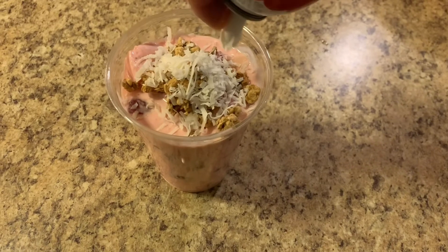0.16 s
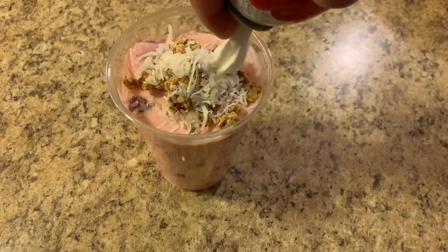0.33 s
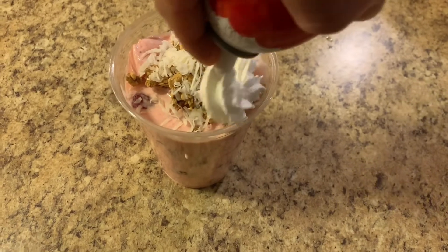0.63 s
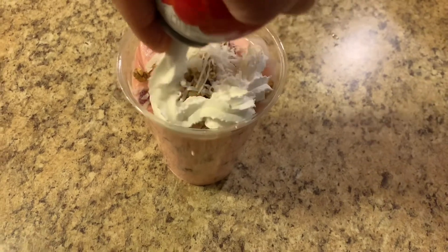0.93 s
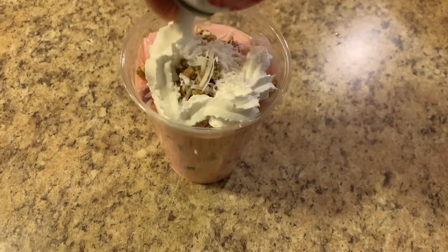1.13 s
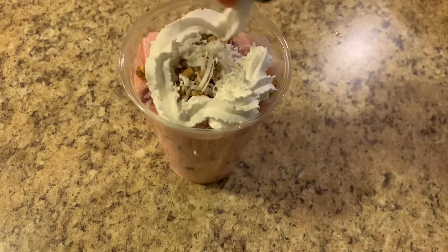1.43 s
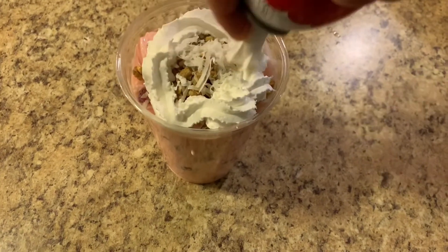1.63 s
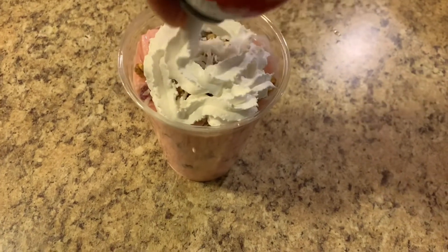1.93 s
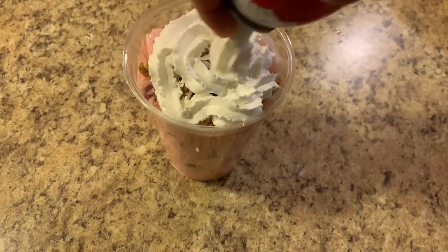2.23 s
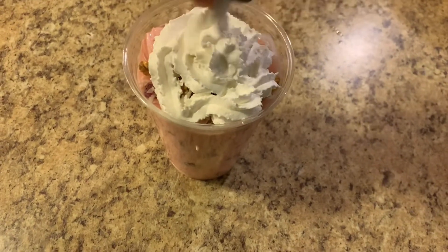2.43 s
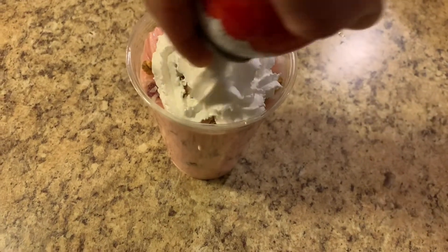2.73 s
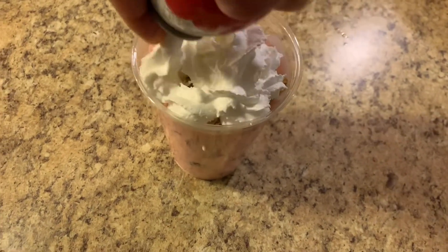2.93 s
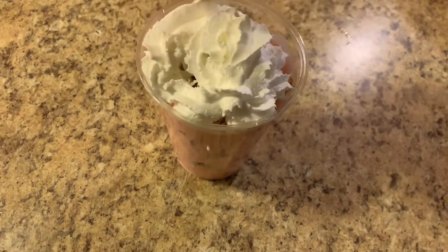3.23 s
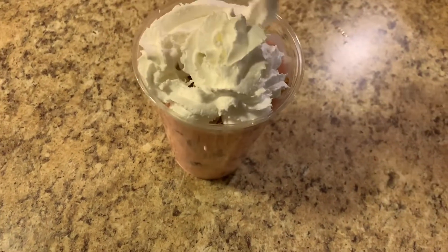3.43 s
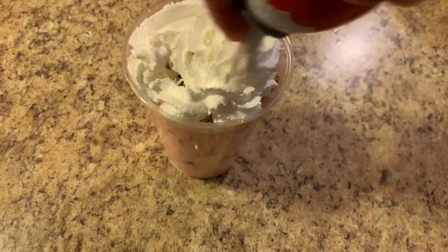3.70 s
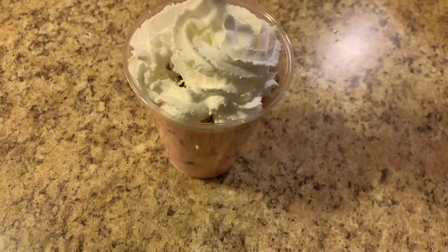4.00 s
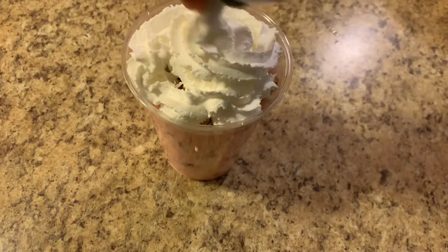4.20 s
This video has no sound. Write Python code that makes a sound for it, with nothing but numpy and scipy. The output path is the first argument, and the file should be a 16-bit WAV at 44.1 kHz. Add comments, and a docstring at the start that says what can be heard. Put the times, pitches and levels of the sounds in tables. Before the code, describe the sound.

A whipped cream can sprays in one long burst close by: bright whistling hiss with a dense, wet, crackling sputter and cup rumble.

```python
"""Whipped cream is piped from an aerosol can onto a cup on a stone counter, close to two microphone ports.
Over a low kitchen murmur the valve opens in small jerks: gas hisses as turbulence and whistles in the nozzle,
and a finger's press gives a soft thump. Gas pockets then burst in the cream as a dense sputter that rings
in the nozzle tube, with dry ticks in the open air; the stream rumbles in the cup, and large pockets pop.
Late on, the tip dips into the heap: the ticks grow quieter and the upper tube ring dies."""
import sys
import numpy as np
from scipy import signal
from scipy.fft import rfft, irfft, next_fast_len
from scipy.io import wavfile

SR = 44100
rng = np.random.default_rng(int(sys.argv[2]) if len(sys.argv) > 2 else 0)


def wav_out(sig):
    """Save sig, one row per channel (or a flat mono array), as 16-bit PCM at SR to the path in sys.argv[1]."""
    wavfile.write(sys.argv[1], SR, np.round(np.clip(np.atleast_2d(sig).T, -1, 1) * 32767).astype(np.int16))


N = 191950


def amp(db):
    """Logarithmic level: decibels to amplitude gain."""
    return 10 ** (np.asarray(db) / 20)


def rms_one(x):
    """Normalisation of mean power: scale to rms 1."""
    return x / np.sqrt(np.mean(x ** 2) + 1e-20)


def in_time(rows):
    """Linear interpolation: each column after the times becomes a curve of one value a sample."""
    s, *columns = np.transpose(rows)
    return [np.interp(np.arange(N) / SR, s, c) for c in columns]


def drift(rate_hz):
    """Low-passed random fluctuation of rms 1: coarse noise twice through a one-pole filter."""
    step, settling = 20, 4000  # samples a coarse step; coarse steps dropped
    r = np.exp(-2 * np.pi * rate_hz * step / SR)
    noise = rng.standard_normal(N // step + settling + 2)
    slow = signal.lfilter([1], [1, -2 * r, r * r], noise)[settling:]
    return np.interp(np.arange(N) / step, np.arange(len(slow)), rms_one(slow))


def resonate(x, modes):
    """Modal resonance: parallel two-pole filters (pitch_hz, width_hz, level_db) with alternating signs."""
    out = 0
    for k, (hz, width_hz, level_db) in enumerate(modes):
        r = np.exp(-np.pi * width_hz / SR)
        b = (1 - r * r) / 2 * np.array([1, 0, -1])
        a = [1, -2 * r * np.cos(2 * np.pi * hz / SR), r * r]
        out = out + (-1) ** k * amp(level_db) * signal.lfilter(b, a, x)
    return out


def twice(x, modes):
    """Cascaded resonance: the filters applied twice, for steep skirts; rms 1."""
    return rms_one(resonate(resonate(x, modes), modes))


def coloured(spectrum, patchy_db, rate_hz, count):
    """Filtered noise: two unrelated noises of one colour, in overlapping bands that flicker separately."""
    hz = np.maximum(np.arange(N // 2 + 1) * SR / N, 1)
    where, level_db = np.transpose(spectrum)
    colour_db = np.interp(np.log(hz), np.log(where), level_db, -60, -60)
    shaped = rfft(rng.standard_normal((2, N))) * amp(colour_db)
    # band number of each frequency, on a logarithmic scale
    place = np.interp(np.log(hz), np.log(where[[0, -1]]), [0, count - 1])
    bands = [irfft(shaped * np.clip(1 - abs(place - k), 0, 1), N) for k in range(count)]
    return rms_one(sum(amp(patchy_db * drift(rate_hz)) * band for band in bands))


def rise(before_db, start_s, length_s, power):
    """Onset envelope: a gain that grows from a low level to 1 as a power of time."""
    progress = np.clip((np.arange(N) / SR - start_s) / length_s, 0, 1)
    return np.clip(amp(before_db) + progress ** power, 0, 1)


def swell(t, peak_s):
    """Transient envelope: up to 1 at the peak time, then away."""
    grown = np.clip(t / peak_s, 0, None)
    return (grown * np.exp(1 - grown)) ** 2


def kitchen():
    """Broadband background: low filtered noise whose bands waver slowly."""
    # the kitchen's low murmur of air and appliances: pitch_hz [Hz], relative level_db [dB per Hz]
    murmur_colour = [(28, -44), (42, -20), (60, 7), (90, -3.5), (140, 5), (190, 0), (260, -20)]
    return amp(-64) * coloured(murmur_colour, patchy_db=-2.5, rate_hz=1.8, count=4)


def jet(jet_db, whistle_db, treble_db):
    """Jet turbulence: smooth bright noise at the valve, with a broad nozzle whistle that comes and goes."""
    # colour of the turbulent jet: pitch_hz [Hz], relative level_db [dB per Hz]
    jet_colour = [(1200, -30), (2700, -19), (4400, -13.5), (5100, -10.5), (5800, -6), (6800, -1),
                  (7700, -6), (8600, -6), (9900, -6), (11500, -10), (13000, -11), (14200, -17),
                  (16300, -20)]
    # resonances of the whistle: pitch_hz [Hz], width_hz [Hz], relative level_db [dB]
    whistle_modes = [(8600, 800, 0), (9350, 1100, -4)]
    whistle = resonate(resonate(rng.standard_normal((2, N)), whistle_modes), [(8800, 1800, 0)])
    hiss = coloured(jet_colour, patchy_db=1.27, rate_hz=7.8, count=14)
    high_pass = signal.butter(2, 8000, "high", fs=SR, output="sos")
    treble = signal.sosfiltfilt(high_pass, hiss)
    hiss = hiss + (amp(treble_db) - 1) * treble
    singing = amp(whistle_db + drift(9)) * rms_one(whistle)
    return amp(jet_db) * (amp(-1.5) * hiss + singing)


def thump():
    """Impulsive excitation: a finger presses the nozzle, one soft, low, decaying oscillation."""
    start_s, pitch_hz, swell_s = 0.012, 85, 0.012
    t = np.clip(np.arange(N) / SR - start_s, 0, 1)
    envelope = t / swell_s * np.exp(1 - t / swell_s)
    return amp(-70) * envelope * np.sin(2 * np.pi * pitch_hz * t) * [[1], [0]]


def clicks(per_s, spread_db):
    """Random point process: gas pockets burst at random, in clumps, with very uneven sizes."""
    sizes = amp(spread_db * np.minimum(rng.exponential(1, N), 4)) * rng.choice([-1, 1], N)
    chance = per_s * amp(1.2 * drift(60)) / SR
    return rms_one(sizes * (rng.random(N) < chance))


def bursts(per_s, spread_db, noise_db):
    """Impulsive and diffuse excitation: fine bursts over the stream's rush; row two is an unrelated rush."""
    rush = rng.standard_normal((2, N))
    fine = clicks(per_s, spread_db) + amp(noise_db) * rush[0]
    return rms_one(np.array([fine, np.sqrt(1 + amp(noise_db) ** 2) * rush[1]]))


def sputter(sputter_db, upper_db, low_db, high_db, hollow_db):
    """Source and resonator: one burst train rings the nozzle tube, the spit at its tip and the hollow."""
    # resonances of the nozzle tube, its upper range, the spit's two ranges, and the hollow
    # between cup and tube: pitch_hz [Hz], width_hz [Hz], relative level_db [dB]
    tube_modes = [(819.6, 52, 2.5), (967, 98, -3.5), (1102, 94, -4), (1221, 32, 3), (1357, 83, -2.5)]
    upper_modes = [(1467, 263, 1), (1648, 14, -2.2)]
    low_spit_modes = [(1922, 610, 0.25), (2670, 820, 1)]
    high_spit_modes = [(2960, 1000, -1), (3930, 1200, 1)]
    hollow_modes = [(705, 127, 0)]
    train = bursts(per_s=600.0, spread_db=2.5, noise_db=-4.5)
    tube = rms_one(resonate(resonate(train, tube_modes), [(1009, 310, 0)]))
    upper = rms_one(resonate(resonate(train, upper_modes), [(1473, 530, 0)]))
    spit = amp(low_db) * twice(train, low_spit_modes) + amp(high_db) * twice(train, high_spit_modes)
    hollow = amp(hollow_db) * twice(train, hollow_modes)
    return amp(sputter_db) * tube + amp(upper_db) * upper + spit + hollow


def crackle(crackle_db):
    """Heavily damped resonance: pockets bursting in the open air are short dry ticks."""
    # resonances of the ticks: pitch_hz [Hz], width_hz [Hz], relative level_db [dB]
    tick_modes = [(1284, 860, 5), (4200, 1000, -24)]
    ticks = twice(clicks(per_s=220.0, spread_db=2.5) + 1e-18, tick_modes)
    return amp(crackle_db) * ticks * [[1], [0]]


def rumble(rumble_db):
    """Cavity resonance: the stream drums low in the cup, whose air rings at two pitches."""
    # colour of the drumming stream: pitch_hz [Hz], relative level_db [dB per Hz]
    rumble_colour = [(60, -31), (140, -11.5), (200, -6), (290, -2), (420, 1), (520, -4.5), (650, -15.5),
                     (800, -10)]
    # resonances of the air in the cup: pitch_hz [Hz], width_hz [Hz], relative level_db [dB]
    cup_modes = [(285, 41, 0.46), (415, 14, 1.8)]
    broad = coloured(rumble_colour, patchy_db=0.2, rate_hz=11.3, count=8)
    return amp(rumble_db) * rms_one(broad + amp(-6.0) * resonate(broad, cup_modes))


def pops():
    """Damped oscillation: a large pocket swells and rings two or three cycles, then cracks as it bursts."""
    # the loudest bursts: peak_s [s], ring peak_db [dB], pitch_hz at the peak [Hz], crack_db over the ring [dB]
    loud_bursts = [(0.05, -50, 1160, 2), (0.074, -46, 1320, -10), (0.084, -43, 1200, -10),
                   (0.103, -36, 1290, -11), (0.125, -46, 1400, -6), (0.148, -34, 1210, -2),
                   (0.173, -35, 1280, -12), (0.189, -35, 1280, -14), (0.211, -38, 1260, -13),
                   (0.252, -31, 1210, -17), (0.267, -33, 1220, -16), (0.303, -33, 1120, -10),
                   (0.319, -30, 1150, -9), (0.387, -32, 1500, -8), (0.417, -29, 1260, -10),
                   (0.445, -29, 1000, -8), (0.538, -27, 1290, -14), (0.567, -30, 1250, -4),
                   (0.613, -30, 1160, -18), (0.641, -29, 1200, -7), (0.661, -29, 1220, -12),
                   (0.698, -29, 1000, 0), (0.736, -32, 1120, -11), (0.747, -32, 1350, -11),
                   (0.762, -31, 1060, -8), (0.8, -33, 1160, -6), (0.861, -33, 1340, -9),
                   (0.883, -34, 1320, -9), (0.893, -27, 1300, -11), (0.919, -30, 1350, -9),
                   (0.936, -31, 1310, -17), (0.961, -32, 1220, -14), (0.975, -30, 1290, -8),
                   (1.021, -35, 1260, -6), (1.035, -30, 1350, -11), (1.054, -30, 1260, -9),
                   (1.08, -35, 1170, -1), (1.095, -25, 1400, -6), (1.103, -35, 1240, -8),
                   (1.129, -32, 1340, -14), (1.137, -32, 1280, -8), (1.156, -33, 1260, 5),
                   (1.165, -31, 1470, -7), (1.176, -31, 1360, -5), (1.183, -28, 1300, -11),
                   (1.195, -33, 1210, -12), (1.204, -35, 1500, -9), (1.217, -33, 1260, -6),
                   (1.229, -34, 1330, -2), (1.237, -31, 1430, -17), (1.251, -29, 1350, -12),
                   (1.266, -34, 1250, -6), (1.303, -33, 1360, -12), (1.323, -26.5, 1390, -15),
                   (1.332, -35, 1340, -15), (1.37, -35, 1280, -13), (1.389, -35, 1570, -12),
                   (1.398, -37, 1290, -5), (1.408, -31, 1310, -18), (1.439, -35, 1310, -8),
                   (1.455, -37, 1270, -8), (1.476, -29.5, 1350, -13), (1.487, -33, 1210, -15),
                   (1.504, -32, 1240, -11), (1.529, -28, 1350, -15), (1.537, -32, 1300, -14),
                   (1.544, -32, 1170, -19), (1.556, -28, 1140, -14), (1.585, -31, 1340, -9),
                   (1.624, -30, 1300, -4), (1.66, -34, 1180, -7), (1.679, -29, 1270, -10),
                   (1.703, -28, 1230, 0), (1.73, -33, 1280, -6), (1.76, -32, 1210, -11),
                   (1.794, -35, 1130, -12), (1.81, -32, 1160, -13), (1.828, -31, 1260, -13),
                   (1.867, -35, 1260, -10), (1.899, -29, 1210, -8), (1.933, -29, 1220, -15),
                   (1.961, -28, 1310, -11), (1.985, -31, 1430, -10), (1.994, -31, 1340, -9),
                   (2.01, -29, 1220, -10), (2.045, -31, 1220, -10), (2.064, -33, 1260, -8),
                   (2.098, -31, 1170, -3), (2.11, -31, 1280, -2), (2.15, -30, 1240, -3),
                   (2.17, -30, 1150, -3), (2.203, -28, 1250, -7), (2.214, -25, 1050, -6),
                   (2.263, -24, 980, -8), (2.362, -28, 1210, -1), (2.381, -27, 1190, -10),
                   (2.389, -27, 1050, -14), (2.421, -28, 1350, -3), (2.445, -29, 1400, -2),
                   (2.457, -26, 1210, -11), (2.492, -27, 1140, -7), (2.545, -29, 1250, -4),
                   (2.571, -27, 1200, -8), (2.582, -28, 1150, -5), (2.618, -29, 1100, -8),
                   (2.634, -26, 950, -8), (2.643, -27, 1020, -9), (2.66, -31, 1150, -8),
                   (2.686, -30, 1030, -12), (2.704, -27, 980, -7), (2.726, -28, 1150, -8),
                   (2.768, -25, 1040, -8), (2.779, -24, 1000, -4), (2.917, -24, 1180, -10),
                   (3.018, -27, 1110, -11), (3.04, -28, 1310, -7), (3.048, -31, 1220, -5),
                   (3.069, -32, 1210, -8), (3.089, -34, 1230, -6), (3.101, -31, 1220, -5),
                   (3.111, -32, 1260, -7), (3.167, -28, 1340, -15), (3.219, -28, 1410, -13),
                   (3.247, -25, 1260, 1), (3.269, -27, 1270, -16), (3.303, -31, 1340, -5),
                   (3.323, -30, 1380, -12), (3.353, -32, 1170, -10), (3.399, -30, 1200, -11),
                   (3.469, -27, 1110, -9), (3.492, -26, 1210, -6), (3.633, -32, 990, -13),
                   (3.645, -30, 1020, -10), (3.675, -31, 980, -5), (3.79, -31, 1050, -11),
                   (3.818, -31, 1030, -11), (3.849, -32, 1070, -10), (3.872, -32, 1160, -12),
                   (3.881, -31, 1100, -10), (3.904, -30, 1110, -13), (3.915, -31, 1030, -10),
                   (3.95, -33, 1040, -16), (3.977, -32, 1080, -11), (4.135, -28, 1040, -14),
                   (4.221, -30, 990, -2), (4.24, -30, 1120, -11), (4.257, -33, 1070, -7),
                   (4.267, -32, 1010, -7), (4.328, -32, 1070, -6)]
    ring_s, crack_s, crack_lag_s = 0.000903, 0.00036, 0.0007  # swell times; the crack starts after the ring
    crack_hz, sag_hz_per_s = 4100, 48000  # the ring drops in pitch as the pocket opens
    out = np.zeros((2, N + SR))
    t = np.arange(round(.012 * SR)) / SR
    phases = rng.random((len(loud_bursts), 2))  # in turns
    for (s, peak_db, hz, crack_db), turn in zip(loud_bursts, phases):
        cycles = (hz - sag_hz_per_s * (t / 2 - ring_s)) * t
        ring = swell(t, ring_s) * np.sin(2 * np.pi * (cycles + turn[0]))
        crack = swell(t - crack_lag_s, crack_s) * np.sin(2 * np.pi * (crack_hz * t + turn[1]))
        at = round((s - ring_s) * SR)
        out[0, at:at + len(t)] += amp(peak_db) * (ring + amp(crack_db) * crack)
    return out[:, :N]


def dips(x):
    """Time-varying band filtering: two ranges are cut or slightly raised as the nozzle circles."""
    # gains of the two ranges: time_s [s], low_dip_db [dB], high_dip_db [dB]
    dip_curves = [(0.0, -3, -11), (0.3, -3, -7), (0.6, 2, 0.5), (0.85, 1, -3), (1.1, -7, -14),
                  (1.4, -11, -10), (1.6, -3, -4), (1.9, -4, 0.5), (2.2, -2.5, 1), (2.6, 0, 1), (3.0, -5, 2),
                  (3.2, -12, -4), (3.4, -10, -8), (3.6, 0, -1), (4.0, 0.5, -6), (4.35, 0, -4)]
    ranges_hz = (717, 120), (2900, 500)  # centre and width
    for (centre_hz, width_hz), gain_db in zip(ranges_hz, in_time(dip_curves)):
        x = x + (amp(gain_db) - 1) * resonate(x, [(centre_hz, width_hz, 0)])
    return x


def ports(near, other):
    """Interaural-style phase and coherence: the right port trails; a share scattered by the counter is its own."""
    # the two ports: pitch_hz [Hz], right_trails [radians], left_over_right_db [dB], likeness [0-1]
    port_rows = [(30, 0.8, -1.5, 0.96), (330, -0.93, -1.5, 1), (418, -0.74, -3.5, 0.96),
                 (525, 0.5, -0.5, 0.98), (683, 1.33, -3, 0.67), (746, 0.7, -1, 0.91), (1020, 0.6, 1, 0.88),
                 (1300, 0.26, -1, 0.76), (1720, 0.22, -0.5, 1), (2510, 1.8, 0, 0.57),
                 (2770, 2.5, -0.1, 0.68), (2870, 4.5, -1.5, 1), (3010, 3, -0.3, 1), (3170, 2.5, -0.5, 0.56),
                 (3940, 2, 0, 0.77), (4224.6, 3, 2.5, 0.77)]
    # treble ranges where the two channels are opposite or equal: from_hz [Hz], to_hz [Hz], phase of right #
    # against left [half turns]
    locked_ranges = [(4250, 5050, 1), (6350, 7550, 2), (8600, 9200, 3), (10500, 11700, 4),
                     (12850, 13800, 5), (14500, 16500, 6)]
    size = next_fast_len(N + SR // 4)
    hz = np.arange(size // 2 + 1) * SR / size
    locked = [(edge, np.pi * turns, 0, 1) for *edges, turns in locked_ranges for edge in edges]
    # between locked ranges the phase steps on and the likeness drops to 0.8
    gaps = [(a[1] + part * (b[0] - a[1]), np.pi * (a[2] + .12 + .7 * part), 0, .8)
            for a, b in zip(locked_ranges, locked_ranges[1:]) for part in (.1, .8)]
    where, trail, balance_db, alike = np.transpose(sorted(port_rows + locked + gaps))
    alike = np.clip(np.interp(hz, where, alike), 0, 1)
    tilt = amp(np.interp(hz, where, balance_db) / 2)
    near, other = rfft(near, size), rfft(other, size)
    mixed = alike * near + np.sqrt(1 - alike ** 2) * other
    right = mixed * np.exp(-1j * np.interp(hz, where, trail))
    return np.array([irfft(near * tilt, size)[:N], irfft(right / tilt, size)[:N]])


def scene():
    """Superposition under common modulation: the uneven flow sways gas, cream and rumble together."""
    # valve opening in small jerks: time_s [s], gas_db below full [dB]
    opening_curve = [(0.0, -52), (0.018, -45), (0.03, -28), (0.042, -22), (0.046, -15), (0.065, -14),
                     (0.07, -10.5), (0.099, -8.5), (0.106, -5), (0.14, 0), (4.35, 0)]
    # flow through the valve: time_s [s], gas jet_db [dB], cream_db [dB]
    flow_curve = [(0.0, -35, -50.5), (0.25, -35.5, -47.5), (0.33, -31, -46.5), (0.4, -32.5, -47),
                  (0.44, -29, -44), (0.52, -30.5, -43.5), (0.75, -32, -46.5), (1.0, -34, -47),
                  (1.2, -30.5, -48.5), (1.375, -35, -48.5), (1.55, -32, -45), (1.85, -33.5, -46),
                  (2.05, -30.5, -45), (2.25, -30.5, -43), (2.375, -31, -44.5), (2.5, -28, -41),
                  (2.8, -29.5, -42), (3.0, -30, -42.5), (3.35, -32.5, -45), (3.5, -32.5, -45),
                  (3.78, -34, -46), (4.0, -33, -43.5), (4.35, -33, -46)]
    # whistle as the nozzle circles: time_s [s], whistle_db relative to the jet [dB]
    singing_curve = [(0.0, -2), (0.15, -2), (0.4, -8), (0.8, -3), (1.0, -7), (1.15, -2), (1.38, -14),
                     (1.7, -4), (1.88, -9), (2.15, -4), (2.35, -12), (2.65, -5), (3.05, -14), (3.5, -4),
                     (3.8, -13), (4.35, -8)]
    # jet's treble over the rest: time_s [s], treble_db [dB]
    treble_curve = [(0.0, 6), (0.1, 5), (0.2, 3.5), (0.4, -0.5), (0.8, -0.5), (1.2, 0), (1.7, 1),
                    (2.1, -0.5), (2.5, -0.5), (2.9, 0), (3.2, -3.5), (3.6, 1), (4.35, 1.5)]
    # nozzle's upper ring, which dies once the tip dips into the heap: time_s [s], upper_db [dB]
    upper_curve = [(0.0, -62), (0.35, -46), (1.1, -52), (1.75, -50), (2.0, -45), (2.5, -46), (2.87, -50.5),
                   (2.93, -46), (3.26, -42.5), (3.46, -49), (3.62, -56), (4.35, -53)]
    # spit and hollow, shifting as the nozzle circles: time_s [s], low_spit_db, high_spit_db, hollow_db [dB]
    colour_curves = [(0.0, -41, -60, -66), (0.1, -51.5, -56, -63), (0.3, -58, -49, -57),
                     (0.5, -51, -47, -56), (0.7, -59, -46.5, -61), (0.9, -58, -52, -58),
                     (1.1, -53, -45, -57), (1.3, -49, -51, -68), (1.5, -50, -49, -55), (1.7, -52, -45, -55),
                     (1.9, -61, -50.5, -59), (2.1, -52.5, -42, -53), (2.3, -51.5, -44, -60),
                     (2.5, -43, -40, -55), (2.75, -44.5, -44.5, -55), (2.9, -51, -47.5, -48),
                     (3.1, -49, -43.5, -56), (3.3, -54, -43, -57), (3.5, -48, -45, -58),
                     (3.7, -46.5, -49, -53), (4.0, -46.5, -45.5, -55), (4.35, -46, -45, -53)]
    jet_db, cream_db = in_time(flow_curve)
    upper_db, = in_time(upper_curve)
    crackle_db, = in_time([(3.3, -49), (4, -60)])  # open-air ticks fade as the tip dips in
    sputter_db = -43 + 1.42 * (cream_db + 45)  # swings more than the cream flow, about its -45 dB mean
    throb = 0.46 * drift(6.4) + 0.45 * drift(25.0) + 0.35 * drift(37)  # dB
    flutter = 2.46 * drift(220)  # dB; the cream comes in quick gulps

    murmur = rise(before_db=-16, start_s=-0.1, length_s=0.6, power=0.5) * kitchen()
    gas = jet(jet_db + 0.71 * throb + 0.27 * flutter, *in_time(singing_curve), *in_time(treble_curve))
    gas = amp(*in_time(opening_curve)) * gas
    cream = amp(0.82 * throb + flutter) * sputter(sputter_db, upper_db, *in_time(colour_curves))
    cream = rise(before_db=-40, start_s=0.0351, length_s=0.11, power=1.9) * (cream + crackle(crackle_db))
    drumming = rumble(cream_db + 0.66 * throb + 0.41 * flutter)
    drumming = rise(before_db=-27.5, start_s=0.0435, length_s=0.19, power=1) * drumming
    near, other = dips(murmur + gas + thump() + cream + drumming + pops())
    return ports(near, other)


def record(dry):
    """Band limiting: a steep elliptic low-pass cuts the top."""
    low_pass = signal.ellip(14, .3, 70, 15750, fs=SR, output="sos")  # order, ripple dB, stop dB, cutoff Hz
    return signal.sosfilt(low_pass, dry)


dry = scene()
out = record(dry)
wav_out(out)
```